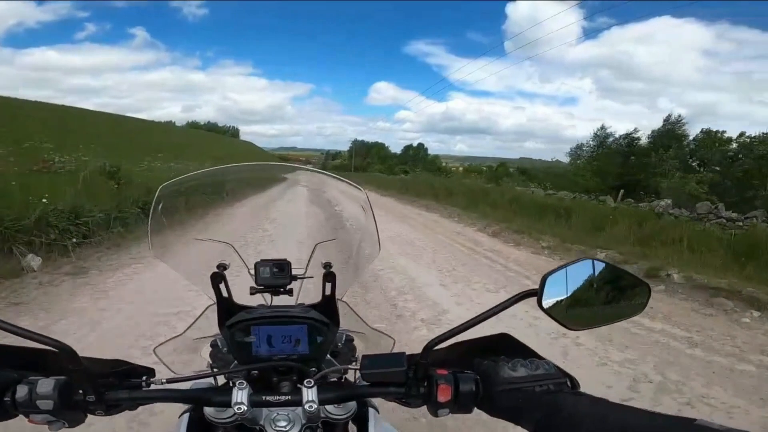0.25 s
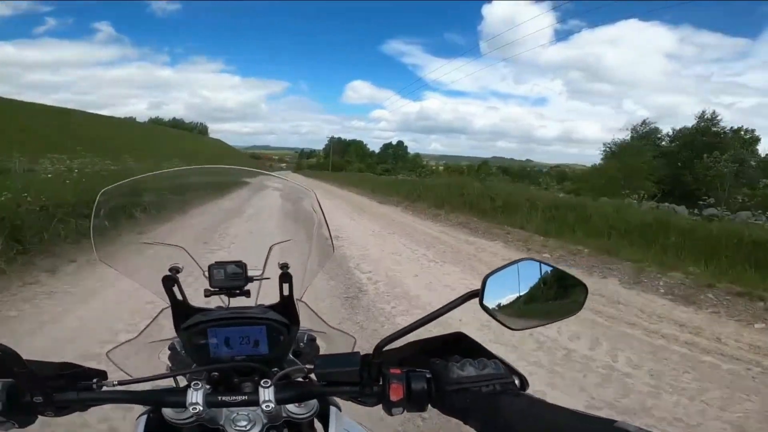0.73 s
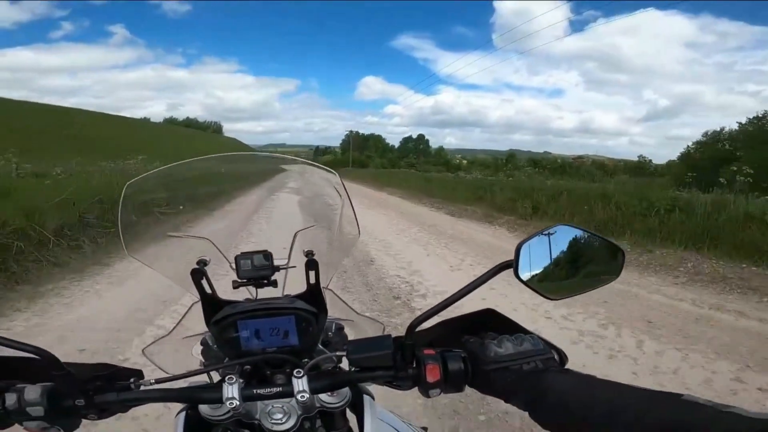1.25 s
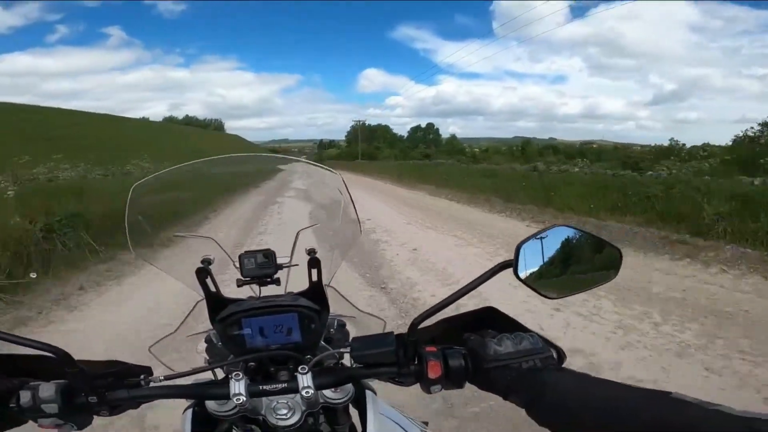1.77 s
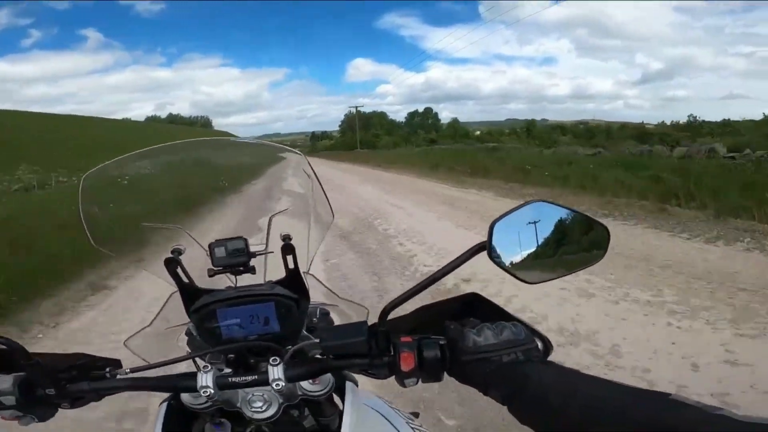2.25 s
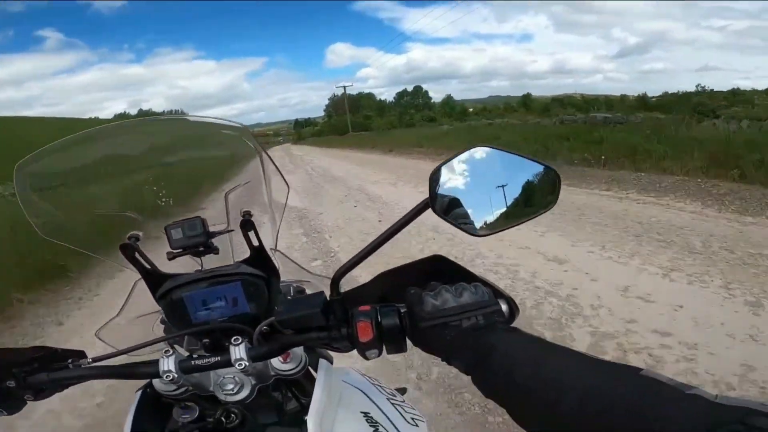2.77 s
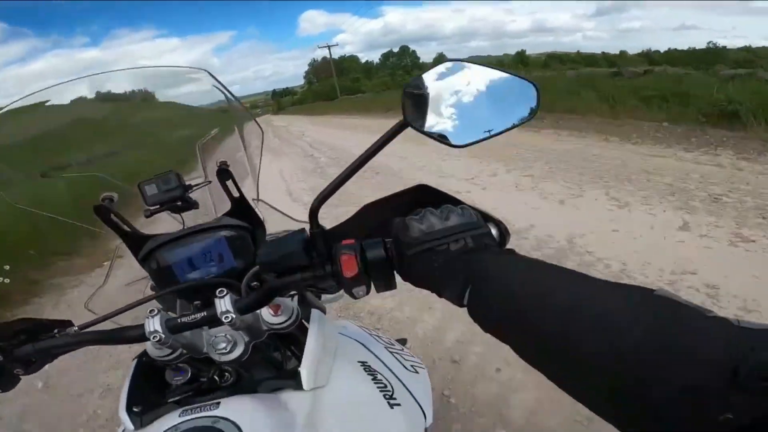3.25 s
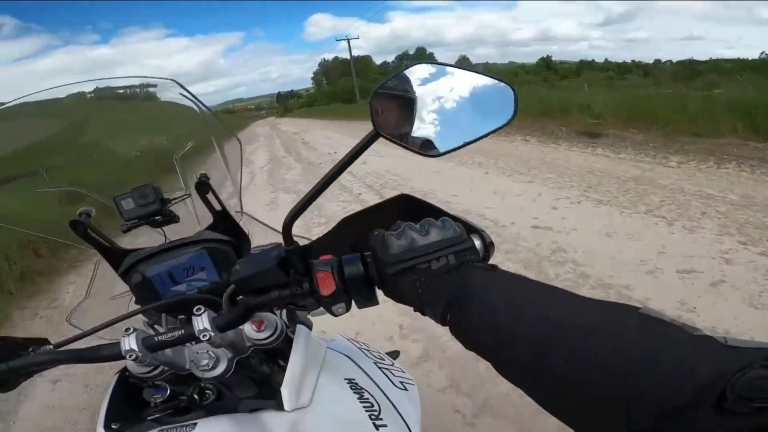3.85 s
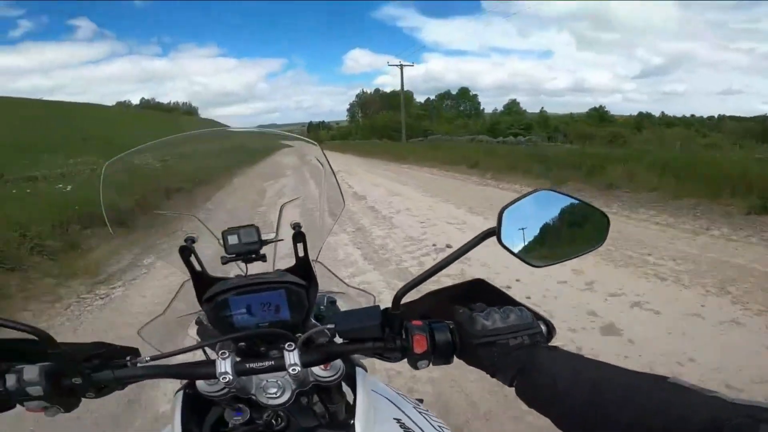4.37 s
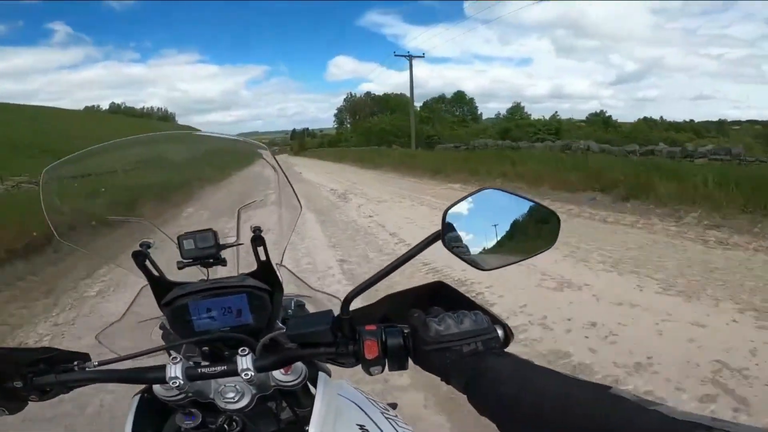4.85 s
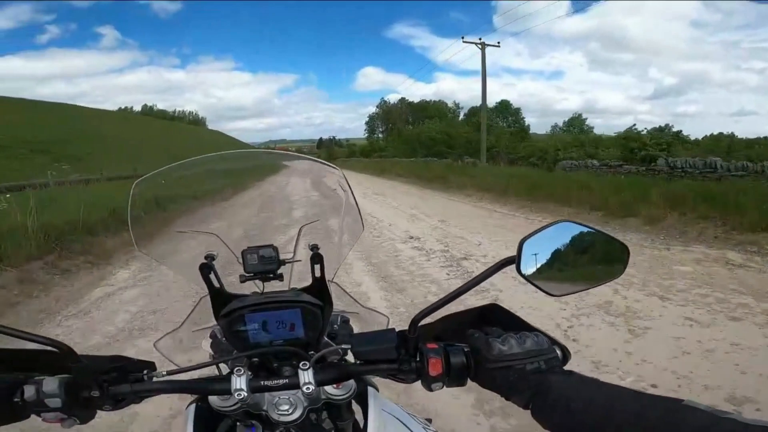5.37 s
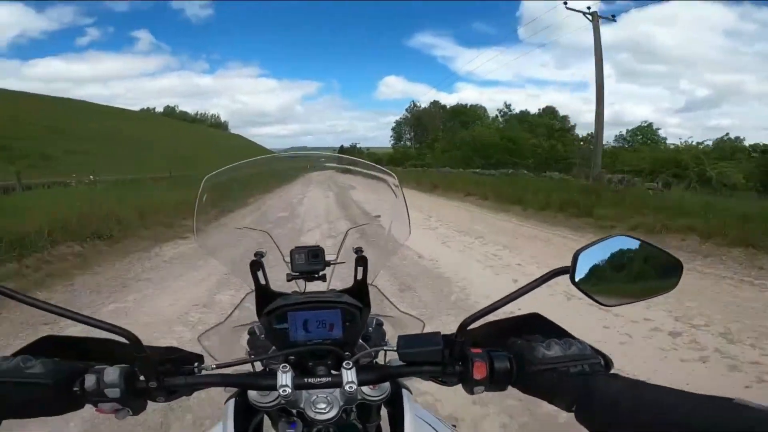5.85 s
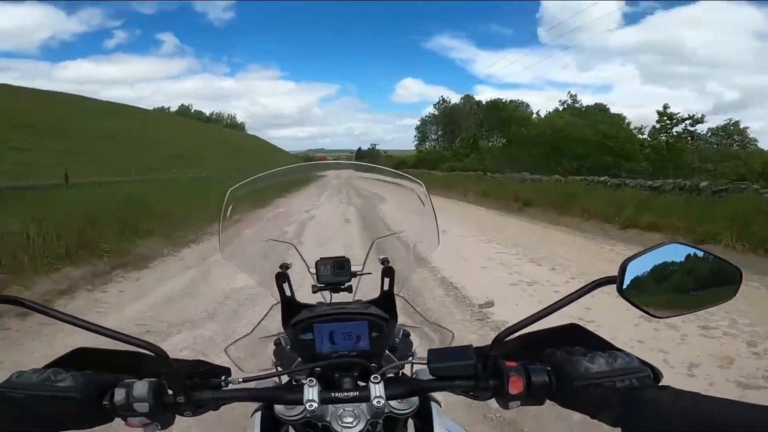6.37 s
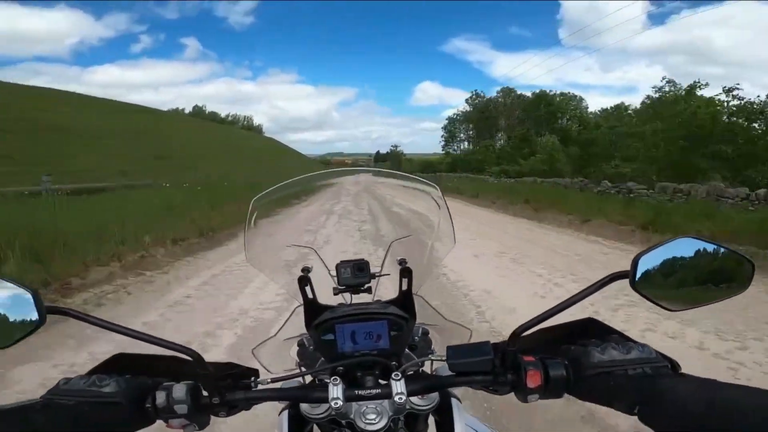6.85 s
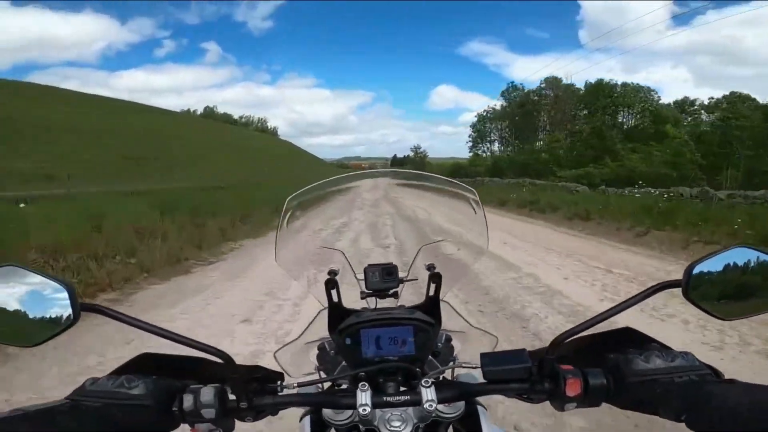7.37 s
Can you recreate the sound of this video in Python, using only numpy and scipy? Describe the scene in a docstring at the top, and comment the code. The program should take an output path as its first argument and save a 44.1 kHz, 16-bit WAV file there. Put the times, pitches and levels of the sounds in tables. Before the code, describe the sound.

A rider's view of a motorcycle on gravel, taken with one chest microphone, outdoors and dry. Heavy wind buffeting rides over a steady low engine drone, whirring gears, metallic hiss and crisp grit noise. After an early knock on the fairing the engine slackens, then pulls with a deeper intake growl and rising note. The strongest gust thumps late, before the throttle closes, reopens and relaxes.

```python
"""A three-cylinder motorcycle on a gravel lane, taken with one microphone on the rider's chest.
It starts at half throttle; a hard knock comes at 0.26 s, a lighter one at 0.68 s, then the bike coasts and slows.
From 1.9 s the throttle opens, the intake growl rises, and by 4.1 s the drone sinks as the engine pulls.
The strongest gust comes at 5.2 s; the throttle shuts at 6.2 s, opens again, and eases off from 6.8 s.
Throughout: shaped noise for wind and crunching stones, crank-locked tones and bursts for the engine."""
import sys
import numpy as np
from scipy import signal
from scipy.fft import rfft, irfft, next_fast_len
from scipy.io import wavfile
from scipy.ndimage import uniform_filter1d, minimum_filter1d, map_coordinates

SR = 44100
rng = np.random.default_rng(int(sys.argv[2]) if len(sys.argv) > 2 else 0)


def unload_audio(sound):
    """Save the sound as a 16-bit wav file, at the path given as the first command line argument."""
    columns = np.transpose(np.atleast_2d(sound))
    # keep every value between -1 and 1, then stretch to whole-number steps
    steps = np.round(np.clip(columns, -1, 1) * 32767)
    wavfile.write(sys.argv[1], SR, steps.astype(np.int16))


N = 336024

# Wind. Levels in spectra and resonances are relative: each layer is brought to rms 1 before its own level.
# wind between gusts: [t/s, level/dB]
BREEZE = [(0, 2), (.8, -0.5), (1.1, 2.5), (1.8, -1), (2.35, 1.5), (2.75, -6.5), (3.3, -1), (4.6, -1.5),
          (5.05, -3), (6, 0.5), (6.7, 1.5), (7.05, -2), (7.62, 3.5)]
# gusts over the windscreen: [t/s at the height, half-length/s, rise/dB, brightness: negative thud, positive hiss]
GUSTS = [(0, 0.034, 6.5, 0.84), (0.206, 0.075, 5, 1), (.56, 0.038, 9, 0.37), (1.53, 0.052, 6.5, 0),
         (2.092, 0.023, 5.5, .95), (2.244, 0.021, 6.5, 0.4), (2.558, 0.023, 8, 0.14),
         (3.004, 0.057, 7.5, -0.32), (3.42, 0.021, 3.5, -.1), (3.752, 0.024, 4.5, -0.45),
         (3.934, 0.055, 7.5, .4), (4.412, 0.079, 5.5, 0.47), (4.73, 0.077, 8.5, 0.28),
         (4.973, 0.02, 4.5, -0.7), (5.22, 0.044, 13, 0.21), (5.39, 0.075, 6, 0.56), (6.496, 0.063, 2, 1),
         (7.16, 0.14, 1.5, -1.3), (7.596, .03, 4, 0.39)]
# spectrum of the thud of the eddies: [f/Hz, level/dB]
BUFFET_SPECTRUM = [(4, 0), (11, 0), (22, -1), (32, -1.5), (45, -5.5), (60, -11), (100, -14), (200, -91),
                   (800, -120)]
# spectrum of the flutter: [f/Hz, level/dB]
FLUTTER_SPECTRUM = [(30, -38), (70, -0.5), (105, -2), (160, -4.5), (220, -4.5), (280, -14), (400, -35.5),
                    (800, -67), (2000, -120)]
# spectrum of the rushing air: [f/Hz, level/dB]
AIR_SPECTRUM = [(120, -48), (250, 0.5), (340, -0.5), (450, -5.5), (600, -15.5), (1000, -17), (1600, -20.5),
                (3000, -33), (8000, -49), (16000, -100)]

# Road.
# tyre crunch: [t/s, level/dB]
CRUNCH_LEVEL = [(0, -42.5), (.8, -46.5), (1.15, -42.5), (1.55, -42.5), (1.8, -47.5), (2.3, -41), (2.9, -44),
                (3.5, -46.5), (4.75, -42), (5.05, -44), (5.55, -42), (6.1, -43.5), (7.62, -45.5)]
# spectrum of the crunch: [f/Hz, level/dB]
CRUNCH_SPECTRUM = [(500, 9), (1300, 8.5), (2500, 14.5), (3300, 6), (4200, -3.5), (4800, -2), (5400, -2),
                   (6100, -10), (6700, -6.5), (8500, -28), (11000, -30), (15000, -40)]
# sprays of loose stones: [t/s at the height, level/dB, half-length/s]
SPRAYS = [(0.157, -40.5, 0.024), (0.293, -44, .02), (0.413, -42.5, 0.016), (1.246, -43, 0.079),
          (1.54, -48, .06), (2.095, -40.5, 0.032), (2.244, -48, 0.02), (2.43, -47, .035),
          (3.138, -44, 0.02), (3.26, -40, 0.03), (3.406, -45, .022), (3.585, -44, 0.082), (3.9, -44, 0.018),
          (4.42, -41, 0.044), (4.633, -41, .027), (5.84, -46.5, 0.057), (6.66, -47.5, .16)]
# mudguard resonances: [f/Hz, width/Hz, level/dB]
MUDGUARD_MODES = [(1320, 1400, -4), (2360, 840, 5), (3370, 340, 3.5), (4900, 230, -2.5), (5880, 260, -7.5),
                  (6600, 480, -8.5), (8060, 1100, -11.5), (9600, 700, -12)]
# bumps: [t/s, peak level/dB before the dulling]
BUMPS = [(0.259, -14), (0.2626, -5), (.2660, -17), (0.677, -19), (3.272, -19), (6.658, -19)]
# fairing modes rung by a bump: [f/Hz, level/dB, decay by 60 dB/s]
FAIRING_MODES = [(414, 6, 0.043), (800, 3.5, 0.025), (1020, 8, 0.022), (1260, 1, 0.021)]

# Engine.
# crankshaft speed: [t/s, turns per second]
CRANK_SPEED = [(0.0, 69.3), (0.47, 69.1), (1.36, 65.7), (2.17, 64.1), (2.6, 64.9), (2.78, 67.0),
               (2.92, 63.4), (3.13, 67.5), (3.36, 65.7), (4.11, 68.7), (5.04, 75.7), (5.84, 80.7),
               (6.0, 77.8), (6.16, 80.3), (6.5, 80.4), (6.74, 82.1), (7.0, 79.1), (7.62, 77.1)]
# the rider's hand: [t/s, throttle opening 0-1]
THROTTLE = [(0, 0.5), (.75, 0.08), (1.1, 0.17), (1.85, 0), (2.75, 0.76), (3.65, 0.52), (3.95, .35),
            (4.12, 0.94), (4.8, 0.9), (5.7, 0.89), (6.22, 0), (6.46, .72), (6.76, 0.66), (7, 0.2),
            (7.62, 0.14)]
# thin metal parts set hissing by valve gear and chain: [f/Hz, width/Hz, level/dB]
TINWARE_MODES = [(3730, 150, 5.5), (4540, 460, -1), (6640, 830, -3.5), (7830, 800, -1), (9050, 1300, -1),
                 (10180, 680, -1.5), (10860, 540, -6), (12050, 520, -8.5), (14700, 1100, -43)]
# engine casing resonances: [f/Hz, width/Hz, level/dB]
CASING_MODES = [(732.4, 83, 1), (868, 68, 3), (1075, 90, 0.5), (1340, 43, -9), (1480, 26, -7),
                (1770, 120, -24)]
# gear noise, before the trim in engine(): [t/s, level/dB]
GEAR_LEVEL = [(0, -39.5), (.85, -41.5), (1.35, -39.5), (1.9, -39.5), (2.15, -41), (3.5, -37.5), (4.7, -40),
              (5.2, -39), (5.65, -41), (6, -37.5), (7.25, -37.5), (7.62, -33.5)]
# gear tones: [multiple of the crank speed, level/dB]
MESH_TONES = [(29.6, 6), (30.4, -1), (31.2, 7.5), (34, -5.5)]
# rattle of the teeth around the mesh: [multiple of the crank speed, level/dB]
WHIRR_SPECTRUM = [(12, -13), (20, -18.5), (24, -4), (27, -5), (30, 4), (32, 2), (36, -7.5), (44, -15.5),
                  (70, -39.5)]
# gear cover resonances: [f/Hz, width/Hz, level/dB]
COVER_MODES = [(2008, 38, 2), (2020, 240, -24), (2350, 224, 2.5), (2900, 680, -15.5), (3175, 240, -0.5)]
# gears sing at some speeds and rattle at others: [crank f/Hz, tones over rattle level/dB]
SINGING = [(64, -3), (65.5, 1.5), (67.5, -6.5), (69.3, -3.5), (72.5, -7), (76, -1), (77.4, -0.5), (79, -9),
           (81.5, -18)]
# how the airbox passes an engine note: [f/Hz, level/dB]
AIRBOX = [(190, 2), (245, 1.5), (262, -1.5), (280, -11.5), (300, -22), (330, -24.5)]

INTAKE_DB, INTAKE_OPENS_DB = -36, 15.5  # level ahead of the airbox, throttle shut; rise when wide open
DRONE_DB, DRONE_DIPS_DB = -17.5, 11.5  # exhaust drone, and how far it recedes at full throttle
BACKLASH = 0.023  # play of the gear teeth, radians of phase per multiple of the crank speed
WHISTLE_ORDER = 60.5  # multiple of the crank speed
WHISTLE_DB, WHISTLE_FADES_DB = -61.5, 8  # level with the throttle shut, loss at full throttle
TONE_WAVER_DB = 2.2  # how much each gear tone wavers in level, rms
TOP_HZ = 15720  # upper band limit of the recorder


def amp(db):
    """Decibels to gain."""
    return 10 ** (np.asarray(db) / 20)


def unit(x):
    """Scale to rms 1."""
    return x / np.sqrt(np.mean(x ** 2) + 1e-20)


def curve(rows):
    """A table of (t/s, value) as one value per sample."""
    t, values = np.transpose(rows)
    return np.interp(np.arange(N) / SR, t, values)


def swell(s, half):
    """A bell-shaped rise and fall around time s."""
    return np.exp(-0.5 * ((np.arange(N) / SR - s) / half) ** 2)


def wobble(rate, step_size=32):
    """A smooth random curve at rms 1, with rate knots a second."""
    knots = rng.standard_normal(N // 16)
    at = np.arange(0, N, step_size)
    coarse = map_coordinates(knots, [at * rate / SR], mode="wrap")
    return unit(np.interp(np.arange(N), at, coarse))


def noise():
    """Fresh white noise."""
    return rng.standard_normal(N)


def filtered(x, response):
    """x times a response, real or complex, of frequency."""
    m = next_fast_len(len(x) + 8192)
    return irfft(rfft(x, m) * response(np.fft.rfftfreq(m, 1 / SR)), m)[:len(x)]


def coloured(x, points):
    """x through a spectrum of (f/Hz, level/dB) points, at rms 1."""
    f, db = np.transpose(points)
    return unit(filtered(x, lambda hz: amp(np.interp(np.log(hz + 1), np.log(f + 1), db))))


def ringing(x, modes):
    """x through resonances of (f/Hz, width/Hz, level/dB) with alternating signs, at rms 1."""
    def body(f):
        total = 0
        for k, (centre, width, db) in enumerate(modes):
            damping = 1j * f * width
            total = total + (-1) ** k * amp(db) * damping / (centre ** 2 - f ** 2 + damping)
        return total
    return unit(filtered(x, body))


def reflected(x, strength=0.14, count=7):
    """Tank, screen and jacket return weak copies within a few milliseconds, which ripple the treble."""
    delays = rng.uniform(0.001, 0.006, count)  # s
    copies = sum(rng.choice([-1, 1]) * np.roll(x, int(d * SR)) for d in delays)
    return unit(x + strength * copies)


def wind(buffet_db=-15.0, flutter_db=-24.5, air_db=-36.0, buffet_grows=1.0, flutter_grows=0.81, air_grows=0.79):
    """Eddies off the windscreen shake the microphone; gusts lift thud, flutter and hiss by their brightness."""
    eddies = coloured(noise(), BUFFET_SPECTRUM)
    eddies = unit(np.tanh(np.sqrt(0.5) * eddies))  # an eddy's pressure is bounded by the road speed
    flapping = coloured(noise() * amp(3.0 * wobble(40)), FLUTTER_SPECTRUM)
    air = coloured(noise() * amp(1.53 * wobble(60)) * (1 + 0.3 * np.abs(eddies)), AIR_SPECTRUM)

    force, tilt = curve(BREEZE) + 0.69 * wobble(9), 0  # dB
    for s, half, db, brightness in GUSTS:
        gust = db * swell(s, half)
        force = force + gust
        tilt = tilt + brightness * gust
    thud = amp(buffet_db + buffet_grows * (force - tilt)) * eddies
    flutter = amp(flutter_db + flutter_grows * force) * flapping
    hiss = amp(air_db + air_grows * (force + tilt)) * air
    return thud + flutter + hiss


def stones(per_s, size_db, dust):
    """Dense clicks of many sizes over the hiss of fine grit."""
    hit = rng.random(N) < per_s / SR
    clicks = hit * noise() * amp(size_db * np.minimum(rng.exponential(size=N), 3))
    return unit(clicks) + dust * noise()


def tyres():
    """Gravel crunches under the tread; loose patches spray against the mudguard."""
    crunch = reflected(coloured(stones(per_s=2700, size_db=1.0, dust=0.5), CRUNCH_SPECTRUM))
    spray = reflected(ringing(stones(per_s=3500, size_db=5.0, dust=1.0), MUDGUARD_MODES))
    crunch_db = curve(CRUNCH_LEVEL) + 1.6 * wobble(22) + 0.33 * wobble(70)
    bursts = sum(amp(db) * swell(s, half) for s, db, half in SPRAYS)
    return amp(crunch_db) * crunch + bursts * spray


def bumps(dull_hz=1700):
    """A hole in the lane knocks the fairing on its rubber mounts: a brief, dull ring of decaying sines."""
    out = np.zeros(N + SR)
    t = np.arange(SR // 10) / SR
    for s, db in BUMPS:
        ring = 0
        for hz, level, t60 in FAIRING_MODES:
            decay = amp(level + rng.normal(0, 1) - 60 * t / t60)
            ring = ring + decay * np.sin(2 * np.pi * hz * t)
        out[round(s * SR):][:len(t)] -= amp(db) * ring / np.abs(ring).max()
    return filtered(out[:N], lambda hz: 1 / (1 + (hz / dull_hz) ** 6))


def firings(turns, scatter_db):
    """One pulse per firing: three cylinders fire unevenly, 180, 270 and 270 degrees apart."""
    cycles = np.arange(0, turns[-1], 2)[:, None]  # each cylinder fires every second turn
    angles = (cycles + np.array([0, 180, 450]) / 360).ravel()
    at = np.interp(angles[angles < turns[-1] - 1], turns, np.arange(N))
    size = amp(scatter_db * rng.standard_normal(len(at)))
    whole, part = at.astype(int), at % 1  # each pulse is shared between two samples
    return np.bincount(whole, size * (1 - part), N) + np.bincount(whole + 1, size * part, N)


def clatter(pulses, decay, steady):
    """A burst of noise after each pulse, dying by 1/e in decay seconds, over a steady share."""
    bursts = signal.lfilter([1], [1, -np.exp(-1 / (decay * SR))], pulses)
    return unit(noise() * (unit(bursts) + steady))


def whistle(turns):
    """The gears whistle thinly while the bike coasts and fall quiet under load."""
    level_db = WHISTLE_DB - WHISTLE_FADES_DB * curve(THROTTLE) ** 2 + 4.0 * wobble(13)
    return amp(level_db) * np.sin(WHISTLE_ORDER * (2 * np.pi * turns + BACKLASH * wobble(75)))


def tinware(pulses):
    """Valve gear and chain set thin metal parts hissing, in bursts after the firings."""
    return reflected(ringing(clatter(pulses, decay=0.0038, steady=1.9), TINWARE_MODES))


def casing(pulses, rattle=3.14):
    """Firings and valve clatter ring the engine casing."""
    blows = unit(pulses - pulses.mean()) + rattle * clatter(pulses, decay=0.0092, steady=1.0)
    return coloured(ringing(blows, CASING_MODES), [(200, -12), (600, 9.5), (750, 3), (1600, 0.5), (4000, -12)])


def gears(speed, turns, pulses, rattle_db=-3):
    """Teeth mesh at multiples of the crank speed; the tones swell as they cross a resonance of the cover."""
    tones = 0
    for order, db in MESH_TONES:
        level = amp(db + TONE_WAVER_DB * wobble(13))
        tones = tones + level * np.sin(order * (2 * np.pi * turns + BACKLASH * wobble(40)))
    tones = 0.74 * unit(tones) + 0.39 * ringing(tones, COVER_MODES)

    # the rattle is fixed in crank angle, so its pitch rides on the engine speed
    steps = 512  # noise samples per crank turn
    spectrum = [(order * SR / steps, db) for order, db in WHIRR_SPECTRUM]
    by_angle = coloured(rng.standard_normal(N * 2), spectrum)
    whirr = map_coordinates(by_angle, [turns * steps])
    whirr = unit(whirr * (1 + 0.17 * np.sin(2 * np.pi * turns)))

    cover = ringing(clatter(pulses, decay=0.0043, steady=0.52), COVER_MODES)
    cover = coloured(cover, [(600, -21), (1800, 5.5), (3300, -11.5), (7000, -19)])
    rattle = unit(whirr + amp(rattle_db) * cover)
    purity = amp(np.interp(speed, *np.transpose(SINGING)))
    return (rattle + purity * unit(tones)) / np.hypot(1, purity)


def pipes(speed, turns, second_db=-34, rough=0.079, waver_db=0.68, burble_db=-31):
    """Exhaust and intake sound crank orders 1-4, growl over drone as the throttle opens; combustion burbles."""
    throttle = curve(THROTTLE)

    def intake(order):
        airbox_db = np.interp(order * speed, *np.transpose(AIRBOX))
        return INTAKE_DB + INTAKE_OPENS_DB * throttle + airbox_db

    drone_db = DRONE_DB - DRONE_DIPS_DB * np.abs(throttle) ** 4.5
    notes = 0
    for order, db in enumerate([drone_db, second_db, intake(order=3), intake(order=4)], start=1):
        tone = np.sqrt(2) * np.sin(2 * np.pi * (order * turns + rng.random()))  # rms 1
        notes = notes + amp(db + waver_db * wobble(7)) * tone * (1 + rough * wobble(45))
    # uneven combustion adds a burble around the notes
    burble = coloured(noise(), [(60, -30), (150, -7), (220, -1.5), (270, -2.5), (350, -21), (600, -54.5)])
    return notes + amp(burble_db) * burble


def engine(casing_db=-38.0, casing_rise_db=14, gear_trim_db=0.7, hiss_db=-53.5, hiss_rise_db=22):
    """Everything that turns with the crankshaft; casing and hiss grow with its speed (dB per tenfold speed)."""
    speed = curve(CRANK_SPEED)
    turns = np.cumsum(speed) / SR
    revs = np.log10(speed / speed.mean())
    pulses = firings(turns, scatter_db=2.0)
    hiss = amp(hiss_db + hiss_rise_db * revs + 0.31 * wobble(12)) * tinware(pulses)
    knock = amp(casing_db + casing_rise_db * revs) * casing(pulses)
    whine = amp(curve(GEAR_LEVEL) + gear_trim_db) * gears(speed, turns, pulses)
    return whistle(turns) + hiss + knock + whine + pipes(speed, turns)


def scene():
    """Wind, road and engine at the one chest microphone."""
    return (wind() + tyres() + bumps() + engine())[None]


def record(dry):
    """The recorder limits the biggest peaks and keeps nothing above its band limit."""
    ceiling = 0.99
    needed = ceiling / np.maximum(np.abs(dry[0]), ceiling)
    gain = uniform_filter1d(minimum_filter1d(needed, size=600), size=600)
    ends = signal.windows.tukey(N, 0.0008)  # a 3 ms fade in and out
    return filtered(dry[0] * gain * ends, lambda hz: hz < TOP_HZ)[None]


dry = scene()
out = record(dry)
unload_audio(out)
```